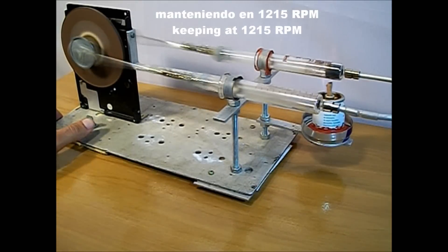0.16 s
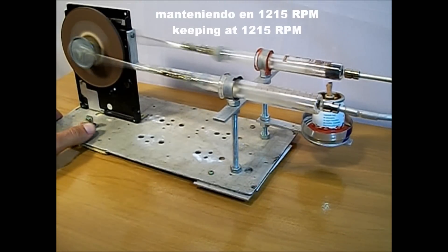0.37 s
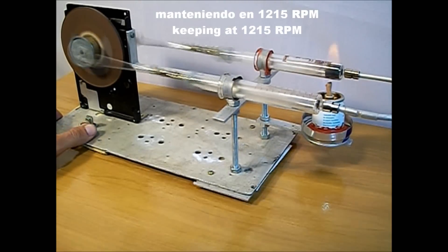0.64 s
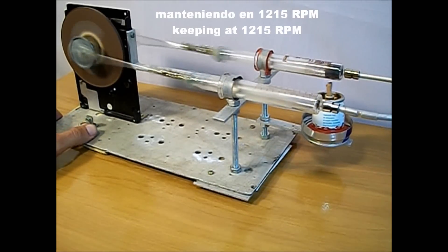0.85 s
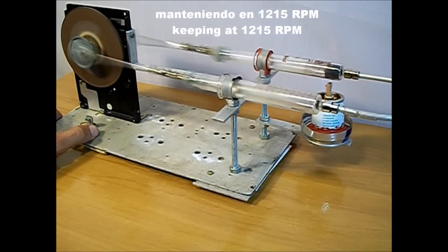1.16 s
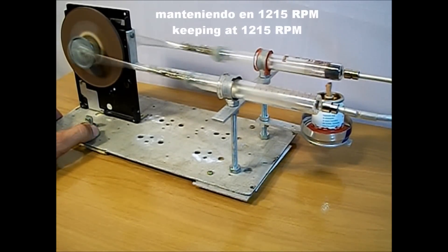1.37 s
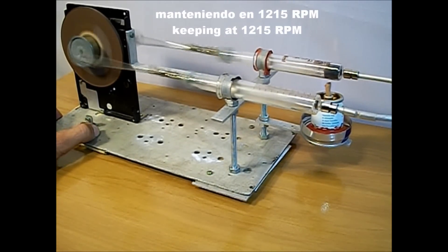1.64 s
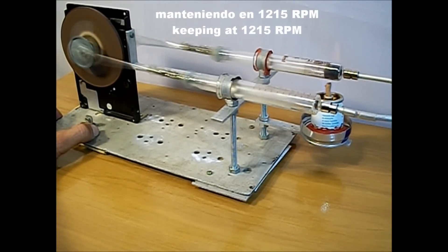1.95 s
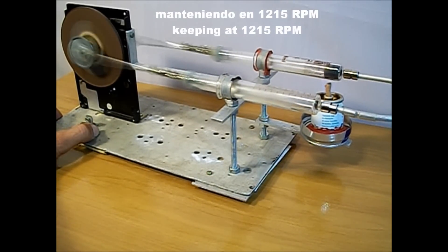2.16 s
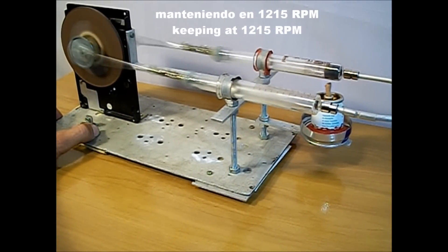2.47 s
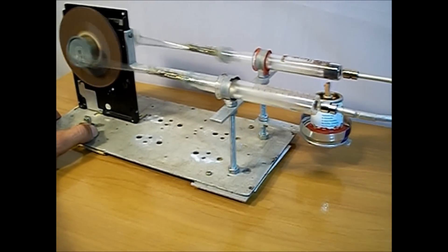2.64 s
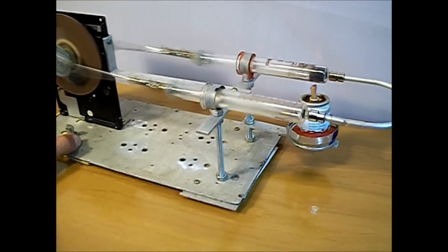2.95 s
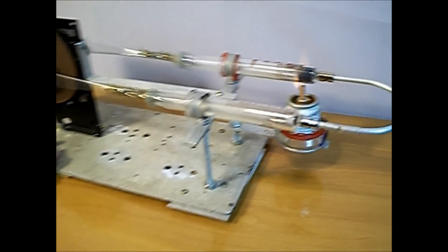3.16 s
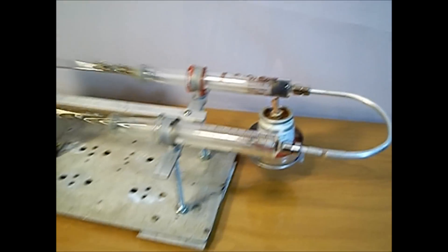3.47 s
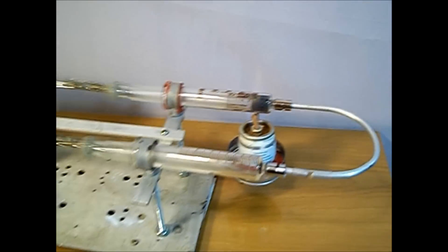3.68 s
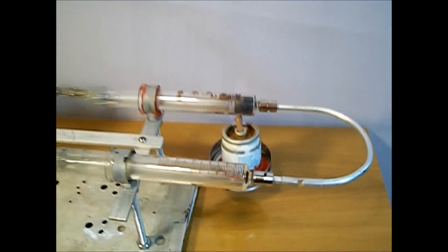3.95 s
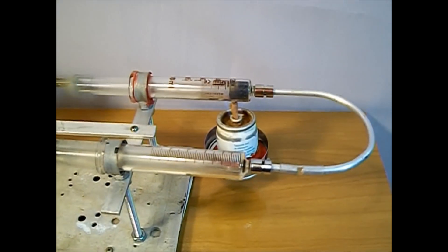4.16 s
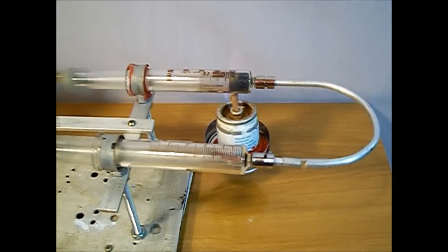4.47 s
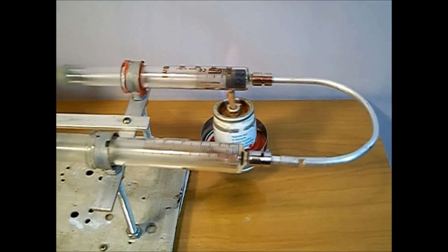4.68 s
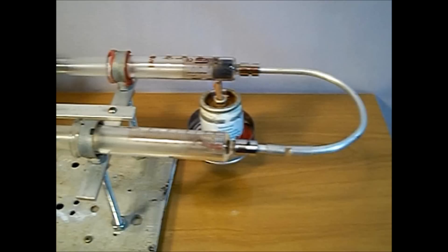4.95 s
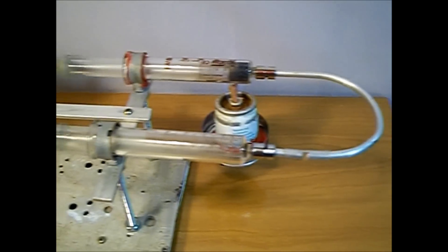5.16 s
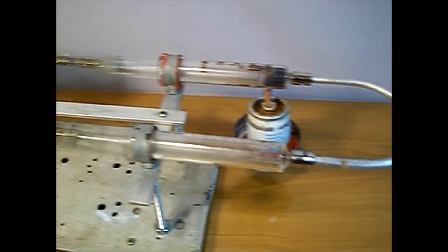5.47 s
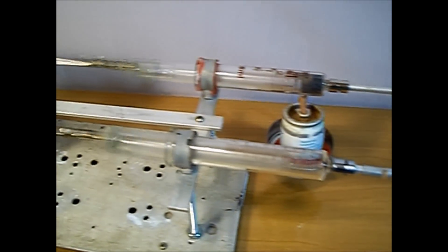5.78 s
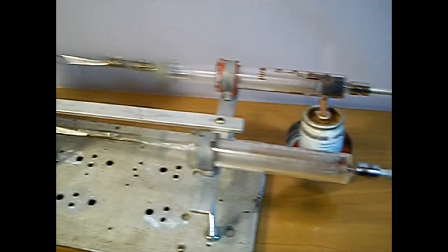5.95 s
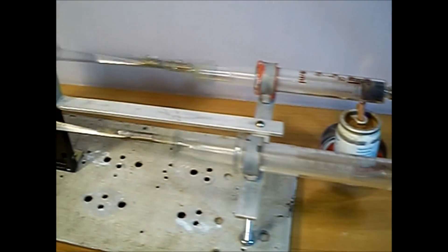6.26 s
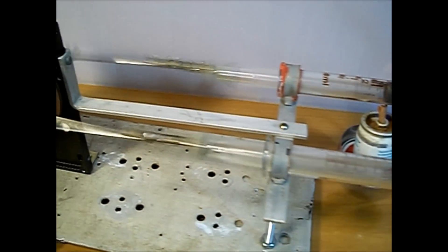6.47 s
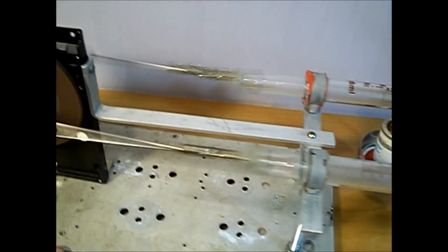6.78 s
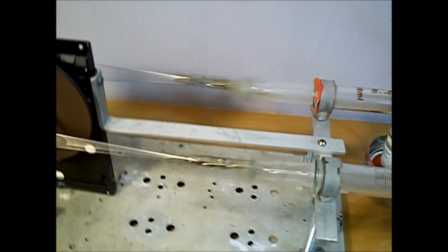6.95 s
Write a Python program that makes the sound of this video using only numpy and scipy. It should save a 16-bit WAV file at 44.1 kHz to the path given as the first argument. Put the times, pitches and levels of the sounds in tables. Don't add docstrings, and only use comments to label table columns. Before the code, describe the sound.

Close, continuous clatter of a bench-top hot-air engine: rapid knocks in metal plate, glass tubes, crank and pins merge into a buzzing purr with a low throb. A very faint distant squeal passes early. Sharp plastic clicks from a hand gripping the microphone's body break in before the middle, with a dull bump. A small tick interrupts the rhythm around five seconds; then the rattle continues to the end, slightly slower, in a small indoor space.

```python
import sys
import numpy as np
from scipy import signal
from scipy.fft import rfft, irfft, next_fast_len
from scipy.io import wavfile
from scipy.ndimage import uniform_filter1d

SR = 44100
rng = np.random.default_rng(int(sys.argv[2]) if len(sys.argv) > 2 else 0)


def int16_out(signal):
    q = np.round(np.clip(np.atleast_2d(signal).T, -1, 1) * 32767)
    wavfile.write(sys.argv[1], SR, q.astype(np.int16))


def boost_factor(decibels):
    exponent = np.asarray(decibels, float) / 20
    return 10 ** exponent


N = 313992
TIME_S = np.arange(N) / SR
CUT_S, CUT_DB = 4.98889, -23


def evened(x):
    return x / np.sqrt(np.mean(x ** 2) + 1e-20)


def curve(rows):
    s, *columns = np.transpose(rows)
    return [np.interp(TIME_S, s, column) for column in columns]


def drift(hz):
    knots = rng.standard_normal(400)
    return evened(uniform_filter1d(np.interp(TIME_S * hz, np.arange(len(knots)), knots), size=2000))


# (time [s], place [0 wide, 1 at the tubes, 2 at the crank end], nearness [dB])
CAMERA = [
    (0, 0, -5.5),
    (1.5, 0.29, -3.5),
    (3, -0.37, -1),
    (4, 1.76, -2),
    (4.5, 1, 0.5),
    (5, 1, 1.5),
    (5.4, 1.3, 0.5),
    (5.8, 1.3, 2.5),
    (6.2, 2.5, -4),
    (7.12, 5, -1.5),
]


def by_place(levels_db):
    s, place, _ = np.transpose(CAMERA)
    coarse = np.arange(0, N + 256, 256)
    place_then = np.interp(coarse / SR, s, place)
    level_db = np.interp(place_then, np.arange(len(levels_db)), levels_db)
    return np.interp(np.arange(N), coarse, boost_factor(level_db))


def resonate(x, hz, width):
    r = np.exp(-np.pi * width / SR)
    return signal.lfilter([1], [1, -2 * r * np.cos(2 * np.pi * hz / SR), r * r], x)


def ring(x, modes, skirt_hz=500):
    out = np.zeros(N)
    for hz, width, *levels_db in modes:
        narrow = resonate(x, hz, width)
        out += by_place(levels_db) * evened(resonate(narrow, hz, width + skirt_hz))
    return out


def struck(rings):
    out, t = np.zeros(N), np.arange(SR // 3) / SR
    rise_cycles, rough = 0.9, 0.2
    for s, db, hz, t60 in rings:
        grain = evened(uniform_filter1d(rng.standard_normal(len(t)), size=16))
        crackle = 1 + rough * np.minimum(hz / 1000, 1) * grain
        onset = 1 - np.exp(-(t * max(hz, 600) / rise_cycles) ** 2)
        out[round(s * SR):][:len(t)] += crackle * boost_factor(db - 60 * t / t60) * onset * np.sin(2 * np.pi * hz * t)
    return out


# (time [s], shaft speed [turns/s])
SPEED = [
    (0, 20.048),
    (.8, 20.033),
    (3.7, 19.945),
    (4.9889, 19.757),
    (4.989, 19.439),
    (5.7, 19.467),
    (7.12, 19.27),
]
START_TURN, SKIP_TURNS = -0.054, 0.606


def shaft():
    return START_TURN + np.cumsum(curve(SPEED)[0]) / SR + SKIP_TURNS * (TIME_S >= CUT_S)


KNOCK_TURNS = [.015, .115, .238, .335, .428, .51, .585, .675, .77]
# (plate [dB], tubes [dB], crank [dB], pins [dB], glass [dB])
KNOCKS = [
    [(-2, -10, -12, -19, -15), (-5, -10, -20, -23, -14), (-7, 4, -15, 6, 6), (-4, -13, -20, -22, -11),
     (-8, 4, 3, -1, 5), (-4, -15, -21, -11, -2), (-14, -5, -25, -19, -14), (0, -11, -20, -18, -7),
     (-4, -7, -15, -16, -16)],
    [(-2, -12, -10, -15, -15), (-5, -22, -5, -19, -16), (-1, 1, -2, 3, -3), (-4, -13, -4, -18, -15),
     (0, -2, -6, 4, 1), (-1, -18, -1, -14, -7), (-3, -15, -1, -17, -21), (-2, -9, -4, -20, 0),
     (-3, -26, -8, -21, -16)],
    [(-3, -4, -7, -16, -20), (-5, -11, -13, -16, -17), (0, 4, -6, -3, -2), (-5, -10, -13, -12, -16),
     (-1, 0, 2, 1, 3), (-8, -3, -14, -7, -8), (-2, -21, -9, -14, -7), (2, -4, -6, -17, 3),
     (-3, -12, -12, -13, -19)],
]
# (wide [dB], at the tubes [dB], at the crank end [dB])
UPPER_PLATE_KNOCKS = [(-11, -6, -11), (-12, -8, -10), (-12, -5, -7), (0, 0, 2), (-14, -9, -9), (1, -1, -3),
                      (-4, 1, -9), (-16, -4, -4), (3, -2, 1)]
# (time [s], peak [dB])
SET_KNOCKS = [(0.3721, -17.5), (0.4739, -17), (0.774, -19.5), (1.064, -17.5), (1.1727, -19.5), (2.161, -18),
              (3.0622, -15.5), (3.3126, -17.5), (3.414, -15), (3.513, -13.5), (3.6169, -19.5), (3.6643, -16.5),
              (3.7136, -18.5), (3.764, -21), (3.866, -17.5), (3.9175, -17), (4.0168, -18.5), (4.118, -21),
              (4.1678, -18), (4.2174, -18.5), (4.318, -19), (4.4188, -20), (4.4577, -14), (4.5227, -16),
              (4.5673, -17.5), (4.6198, -20.5), (4.6717, -22), (4.7224, -19.5), (4.8209, -22), (4.8827, -14.5),
              (4.9727, -20.5), (5.0459, -18), (5.1007, -13), (5.201, -16.5), (5.2503, -19), (5.3553, -16.5),
              (5.405, -16), (5.4562, -18.5), (5.5082, -20), (5.665, -23.5), (5.7659, -17.5), (5.8163, -17),
              (5.9698, -18), (6.086, -13), (6.28, -20.5), (6.3315, -19), (6.59, -16), (6.6407, -17),
              (6.6926, -14), (6.7462, -20), (6.8479, -18.5), (7.0016, -20.5)]
USUAL_DB = -18
# (wide [dB], at the tubes [dB], at the crank end [dB])
RUB_DB = [(-9, -11, -12), (-10, -23, -21), (-16, -9, -13), (-17, -18, -15), (-14.5, -16, -16.5),
          (-12, -12, -12)]
RATTLE_S = [0.0012, 0.0033, 0.00072, 0.0019, .0014, 0.00093]
BLOW = [10, 10, 12, 14, 2, 20]
LATE_TURNS = [0, .012, 0, .014, -.022, -.018]
TURN_DB = [1.2, .3, .4, 1.3, 1.3, 1.4]


def knocks(part, play):
    jitter_s, creep_s, spread_db, creep_db = 0.0003, 0.0004, 1.0, 1.0
    repeat, stroke_db, chatter_rise_s = 0.9, 3.5, 0.0007
    turns = shaft()
    angle = np.arange(len(play))[:, None] - 1 + np.array(KNOCK_TURNS)
    due = np.interp(angle, turns, TIME_S, left=-1, right=99)

    late_creep = evened(uniform_filter1d(play[..., 0], size=9, axis=0))
    force_creep = evened(uniform_filter1d(rng.standard_normal(angle.shape), size=9, axis=0))
    at = due + jitter_s * play[..., 0] + creep_s * late_creep
    own_chance = rng.standard_normal(angle.shape)
    chance_db = spread_db * (0.8 * play[..., 1] + 0.6 * own_chance) + creep_db * force_creep

    place = np.interp(due, *np.transpose(CAMERA)[:2])
    table = np.dstack([KNOCKS, np.transpose(UPPER_PLATE_KNOCKS)])[..., part]
    strength_db = np.zeros(angle.shape)
    for here, forces_db in zip(np.eye(len(table)), table):
        strength_db += np.interp(place, np.arange(len(table)), here) * forces_db

    for hit_s, db in SET_KNOCKS:
        nearest = np.unravel_index(abs(due - hit_s).argmin(), due.shape)
        at[nearest], chance_db[nearest] = hit_s, db - USUAL_DB
    chance_db += TURN_DB[part] * play[:, :1, 2]
    at += LATE_TURNS[part] / 20

    heard = (at > 0) & (at < (N - 1) / SR) & (abs(due - CUT_S) > 1.2e-4)
    blows = np.zeros(N)
    np.add.at(blows, (at[heard] * SR).astype(int), boost_factor(strength_db + chance_db)[heard])
    risen = signal.lfilter(*signal.butter(1, 1 / (np.pi * chatter_rise_s * SR)), blows)
    chatter = signal.lfilter([1], [1, -np.exp(-1 / (RATTLE_S[part] * SR))], risen)

    angle_now = turns % 1
    surface = rng.standard_normal(SR // 20)
    worn = surface[(angle_now * len(surface)).astype(int)]
    fresh = rng.standard_normal((2, N))
    load_db = stroke_db * np.cos(2 * np.pi * (angle_now - 0.6))
    rattle = chatter * (repeat * worn + np.sqrt(1 - repeat ** 2) * fresh[0])
    rub = by_place(RUB_DB[part]) * boost_factor(load_db) * (0.42 * worn + 1.2 * fresh[1])
    return rattle + rub + BLOW[part] * blows


# (pitch [Hz], width [Hz], wide [dB], at the tubes [dB], at the crank end [dB])
PLATE = [(630, 98, -56, -62.5, -63), (776, 110, -59, -51.5, -51), (903, 25, -47, -43, -48),
         (995, 57, -43.5, -42.5, -41), (1117.6, 135, -38, -40, -37.5), (1665, 13, -39.5, -34.5, -35.5)]
TUBES = [(1668, 25, -53, -45.5, -44.5), (1773, 50, -49, -39, -36.5), (1842, 82, -43, -29, -33.5),
         (1921, 24, -49.5, -39, -40.5), (2479, 86, -48, -33.5, -36.5), (2380, 200, -48, -46.5, -43.5)]
CRANK = [(3283, 39, -42, -55, -44), (3189, 130, -41, -47, -42.5), (3326, 60, -54, -51.5, -48)]
PINS = [(4270, 70, -50, -45.5, -44), (4370, 100, -51, -54, -61.5)]
GLASS = [(3810, 94, -54, -63, -57.5), (5290, 1100, -41.5, -43, -42.5), (5690, 630, -48, -45.5, -40),
         (5460, 530, -63, -56.5, -49.5)]
UPPER_PLATE = [(1363, 73, -43.5, -47, -39), (1473, 38, -42.5, -48.5, -37.5), (1542, 15, -50.5, -49, -43.5)]


def linkage(play):
    parts = (PLATE, TUBES, CRANK, PINS, GLASS, UPPER_PLATE)
    rung = sum(ring(knocks(k, play), modes) for k, modes in enumerate(parts))
    return boost_factor(0.018 * curve(CAMERA)[1]) * rung


# (wide [dB], at the tubes [dB], at the crank end [dB])
HUM_DB = [-31.5, -29, -24.5]
# (shaft order [per turn], wide [dB], at
# the tubes [dB], at the crank end [dB], extra until the hand presses the plate [dB])
SHAKE = [(1, -33, -33, -27.5, 2), (2, -43, -41.5, -38, -2.5), (4, -46, -42.5, -42.5, 6),
         (5, -54, -49, -46.5, -2), (6, -46.5, -56.5, -44, -6), (7, -50, -41.5, -42.5, 12),
         (8, -52.5, -45.5, -43.5, 0), (9, -55.5, -50.5, -56, -6.5), (10, -49.5, -53, -45.5, -11.5),
         (11, -47, -51, -48.5, -7), (12, -46.5, -49, -45, -19.5), (13, -38, -43.5, -39.5, -1.5),
         (14, -41, -47, -36.5, -7), (15, -51, -48.5, -46.5, -9),
         (16, -57, -55, -63, 3), (17, -59, -55, -51, 6), (19, -59, -63, -62, -1), (21, -60, -64, -66, -9),
        (25, -61, -72, -61, -6), (27, -58, -59, -62, -1), (28, -60, -59, -54, -8), (30, -55, -55, -58, 4),
        (31, -63, -62, -55, -9), (32, -59, -62, -55, -2), (33, -68, -58, -59, 14), (34, -66, -57, -65, 7),
        (38, -68, -58, -57, 12), (40, -64, -57, -51, -5), (44, -49, -58, -60, -2)]
# (pitch [Hz], width [Hz], wide [dB], at the tubes [dB], at the crank end [dB])
BENCH = [(267.7, 26, -44, -40.5, -45.5), (330.6, 26, -57, -48.5, -56)]
THUMP_TURNS = [.63, .625, .575]
PRESS_S = 0.4, 1.35


def bench(wander_db=0.8, wander_turns=0.03):
    thump_lag, rod_lag, scatter = 0.092, -0.2, 0.4
    near_shake = 0.68
    sing_hz, sing_db = 1661.5, -32
    place, near_db = curve(CAMERA)
    turns = shaft() - np.interp(place, np.arange(3), THUMP_TURNS)
    slack = np.interp(TIME_S, PRESS_S, [1, 0])
    orders = by_place(HUM_DB) * boost_factor(near_db) * np.cos(2 * np.pi * (3 * turns - thump_lag))
    for order, *levels_db, slack_db in SHAKE:
        loose = min(order / 9, 1.3)
        lag = thump_lag + rod_lag * (order == 2) + scatter * rng.standard_normal() * (order > 8)
        angle = order * turns - lag + loose * wander_turns * drift(3)
        swell_db = near_shake * near_db + slack * slack_db + loose * wander_db * drift(3)
        orders += by_place(levels_db) * boost_factor(swell_db) * np.cos(2 * np.pi * angle)
    table_top = ring(rng.standard_normal(N), BENCH)
    sing_turns = np.cumsum(sing_hz + 1.7 * drift(10)) / SR
    singing = slack * boost_factor(sing_db + 1.8 * drift(6.3)) * np.sin(2 * np.pi * sing_turns)
    return np.sqrt(2) * orders + table_top + singing


# (time [s], peak [dB], pitch [Hz])
PINGS = [(1.285, -23, 1000), (1.385, -27, 899), (1.534, -28, 894), (1.834, -24, 993), (2.084, -26, 980),
         (2.334, -25, 891), (3.354, -24, 1010), (5.71, -26, 894), (5.865, -26, 956), (5.969, -26, 991),
         (6.071, -25, 942)]


def plate_pings():
    return struck([(*ping, 0.058) for ping in PINGS])


# (time [s], peak [dB], pitch struck [Hz], reach [octaves])
CLICKS = [(2.6694, -7, 1000, 0.4), (2.6716, -10, 1133, 0.34), (2.6705, -15, 1483, 0.31),
          (2.6779, 1.5, 2000, 0.7), (2.6885, -11, 1500, 0.6), (2.782, -15, 1000, .3),
          (2.8435, -8, 1000, 0.35), (2.8465, -3, 940, 0.28), (2.8495, -16, 1440, 0.28),
          (2.871, -17, 1390, 0.23), (2.8685, -5, 1000, .3), (2.8715, -10, 1100, 0.2),
          (2.8747, -7, 900, 0.3), (2.8755, -9, 656, 0.091), (2.934, -9, 890, 0.25)]
# (pitch [Hz], level [dB], t60 [s])
SHELL = [(641, -10.5, 0.074), (920, -13, 0.029), (1050, -12, 0.025), (1240, -8, 0.02), (1430, -3, 0.014),
         (1650, -3, 0.012), (2400, -3.5, 0.016), (2600, -6, 0.012), (3380, -6, 0.018), (3950, -3, 0.016),
         (5130, 0, .008)]
# (time [s], peak [dB], pitch [Hz], t60 [s])
BUMPS = [
    (2.678, -25, 43.5, 0.28),
    (2.679, -27, 180, 0.092),
    (2.684, -33, 600, 0.05),
    (2.7085, -17.5, 58.3, 0.23),
    (3.85, -33.5, 418, 0.31),
    (5., -34, 380, .3),
]


def camera_body():
    rings = []
    for s, db, struck_hz, reach in CLICKS:
        for hz, mode_db, t60 in SHELL:
            off_pitch = np.log2(hz / struck_hz) / reach
            rings.append((s, db + mode_db - 6 * off_pitch ** 2, hz, t60))
    return struck(rings + list(BUMPS))


# (frequency [Hz], level [dB per Hz])
WASH = [(25, 5), (265, -16), (515, -29), (1690, -1), (2900, -22), (3630, -22.5), (4260, -12), (5630, -58)]
SKIRT_HZ = 5650


def wash(play):
    hz = np.fft.rfftfreq(N, 1 / SR)
    gated = 0.95 * hz ** 2 / (hz ** 2 + 1500 ** 2)
    beating = rfft(evened(knocks(4, play)))
    steady = rfft(rng.standard_normal(N))
    drive = gated * beating + np.sqrt(1 - gated ** 2) * steady
    f, level_db = np.transpose(WASH)
    colour = boost_factor(np.interp(np.log(np.minimum(hz, SKIRT_HZ - 300) + 1), np.log(f), level_db))
    colour *= hz ** 4 / (hz ** 4 + 14.0 ** 4)
    return boost_factor(-35.5) * by_place([0, 0.7, 1.5]) * evened(irfft(drive * colour, N))


def whistle():
    start_s, length_s, base_hz, bend_hz, level_db = 0.44, 0.26, 765, 42, -43
    arch = np.sin(np.pi * np.clip((TIME_S - start_s) / length_s, 0, 1)).clip(0)
    turns = np.cumsum(base_hz + bend_hz * arch) / SR
    return boost_factor(level_db) * np.sqrt(2 * arch) * np.sin(2 * np.pi * turns)


def scene():
    play = rng.standard_normal((int(shaft()[-1]) + 2, len(KNOCK_TURNS), 3))
    engine = linkage(play) + bench() + plate_pings()
    return np.tile(engine + camera_body() + wash(play) + whistle(), (2, 1))


def gate(skirt, size, share, chance_db):
    power = uniform_filter1d(skirt ** 2, size=size) * boost_factor(chance_db * drift(24))
    return uniform_filter1d(1.0 * (power < np.quantile(power, share)), size=size // 3)


def low_pass(x):
    return signal.sosfilt(signal.butter(12, 16000, fs=SR, output="sos"), x)


def record(dry):
    limit = 1.1
    left_lag, mono_hz = 3.68, 110
    edge_hz, spike_hz, spike_end_hz, spike_db = 5600, 6330, 6900, -11
    size = next_fast_len(N + 4096)
    hz = np.fft.rfftfreq(size, 1 / SR)
    lag = left_lag * hz ** 4 / (hz ** 4 + mono_hz ** 4)
    band = hz / (hz + 2) / np.sqrt(1 + (hz / edge_hz) ** 13) / np.sqrt(1 + (hz / spike_end_hz) ** 40)
    bent = np.pad(limit * np.tanh(dry / limit), ((0, 0), (0, size - N)), "reflect")
    wide = rfft(bent) * band * np.exp(-1j * np.pi * hz / SR * lag * np.array([[1], [-1]]))

    skirt = irfft(wide * np.clip((hz - SKIRT_HZ) / 150, 0, 1), size)[:, :N]
    spike = irfft(wide * np.clip((hz - spike_hz) / 100, 0, 1), size)[:, :N]
    shut = gate(skirt[0], size=800, share=0.53, chance_db=8)
    spike_open = (1 - shut) * (1 - gate(spike[0], size=150, share=0.8, chance_db=9))
    out = irfft(wide, size)[:, :N] - shut * (skirt - spike)
    out -= (1 - boost_factor(spike_db) * spike_open) * spike

    out[:, round(CUT_S * SR) + np.arange(2)] += boost_factor(CUT_DB) * boost_factor(np.array([[2.3], [-2.3]])) * [1, 0.5]
    out[:, -64:] *= np.linspace(1, 0.1, 64)
    return low_pass(out)


dry = scene()
out = record(dry)
int16_out(out)
```